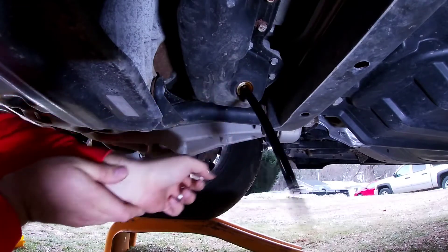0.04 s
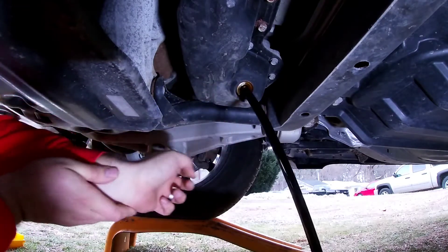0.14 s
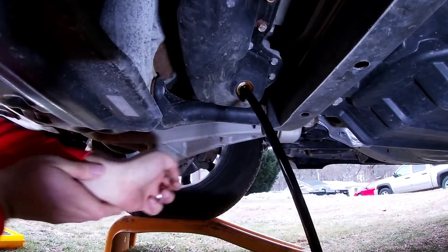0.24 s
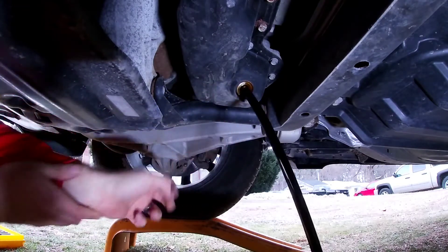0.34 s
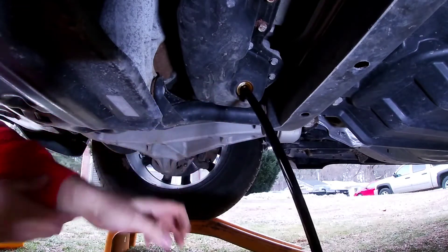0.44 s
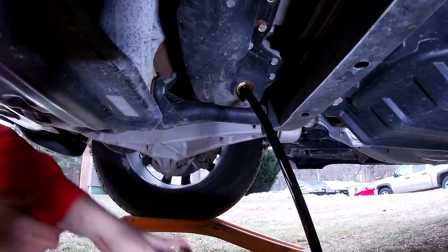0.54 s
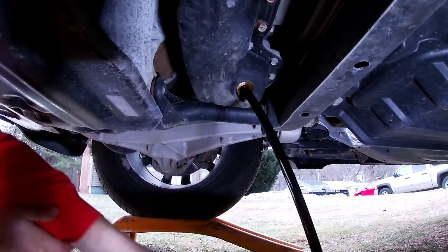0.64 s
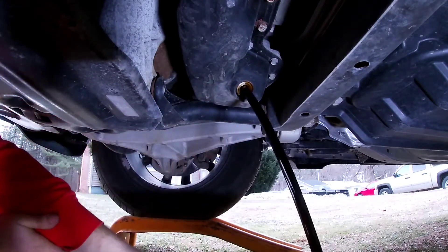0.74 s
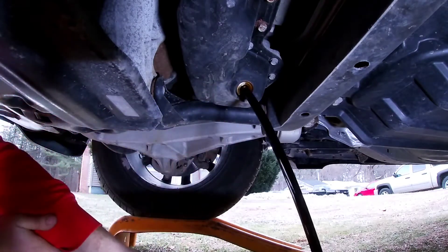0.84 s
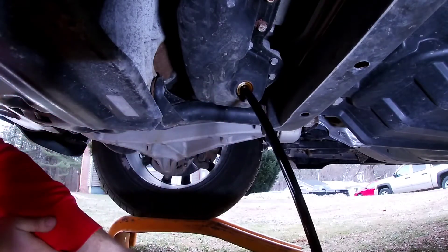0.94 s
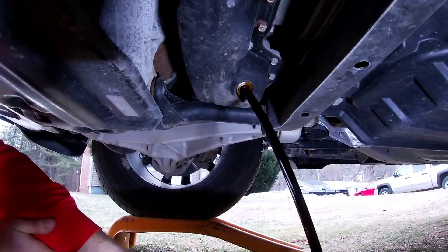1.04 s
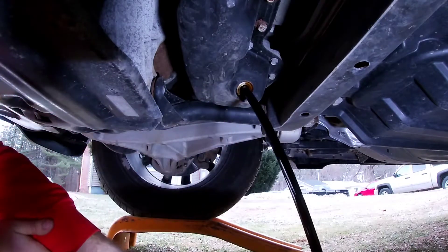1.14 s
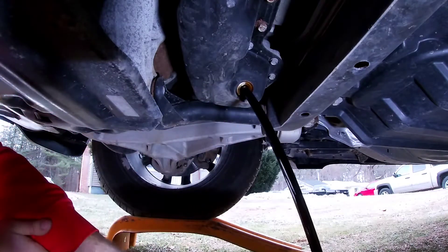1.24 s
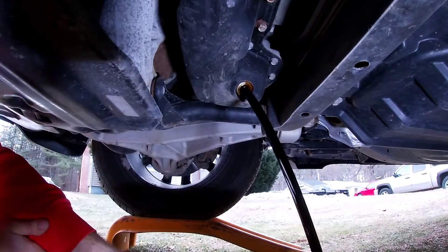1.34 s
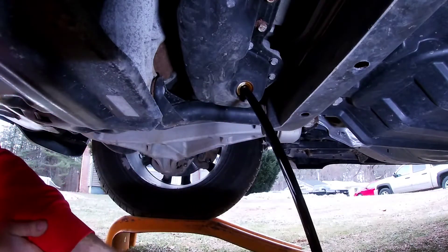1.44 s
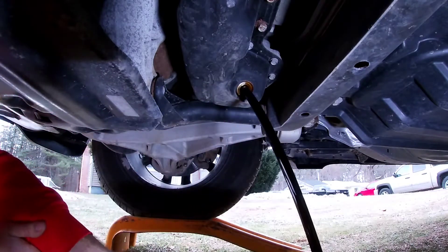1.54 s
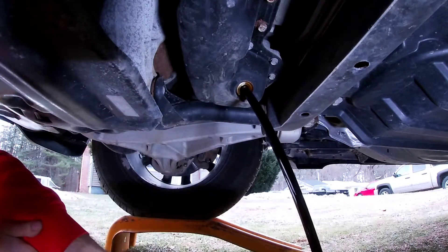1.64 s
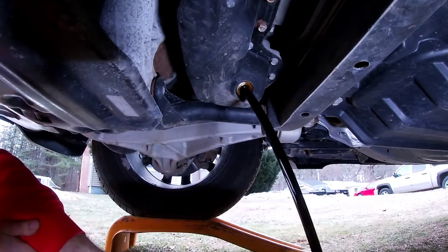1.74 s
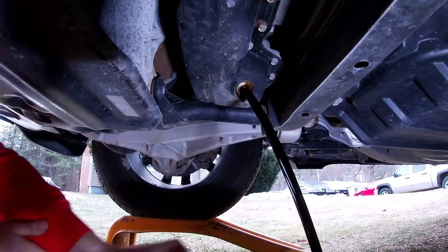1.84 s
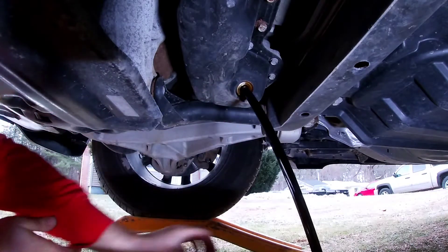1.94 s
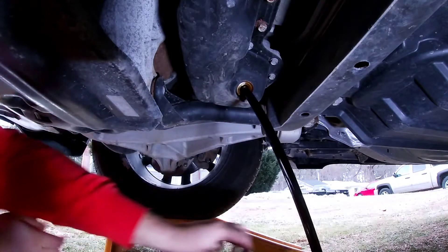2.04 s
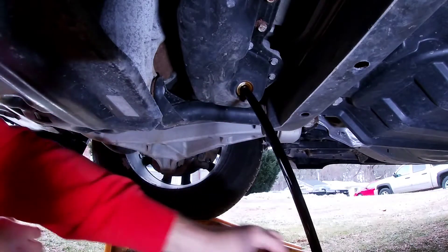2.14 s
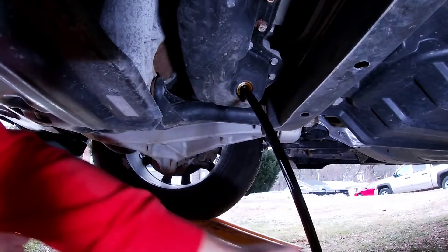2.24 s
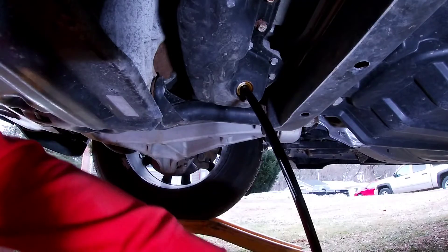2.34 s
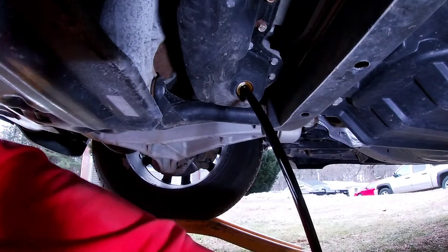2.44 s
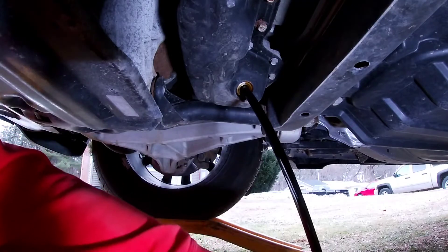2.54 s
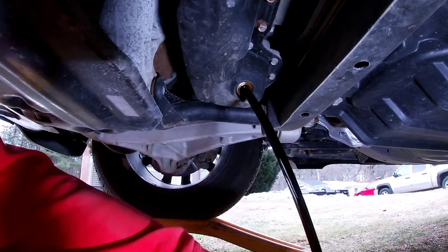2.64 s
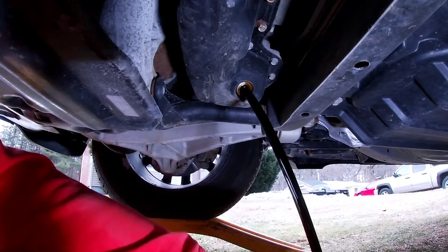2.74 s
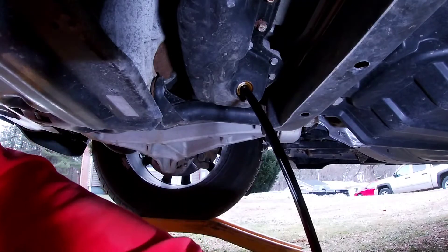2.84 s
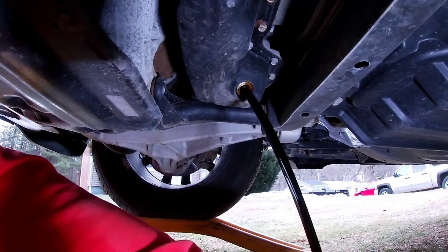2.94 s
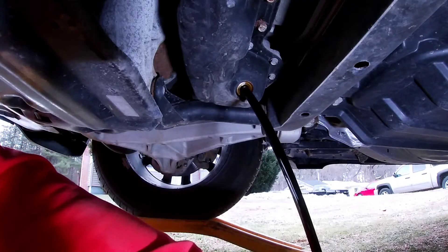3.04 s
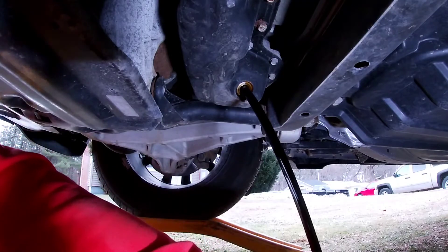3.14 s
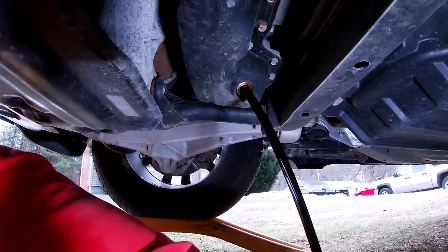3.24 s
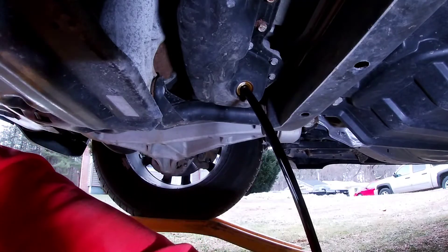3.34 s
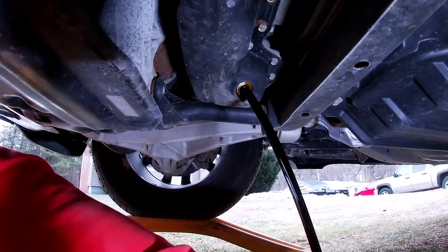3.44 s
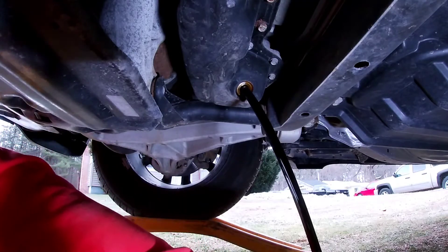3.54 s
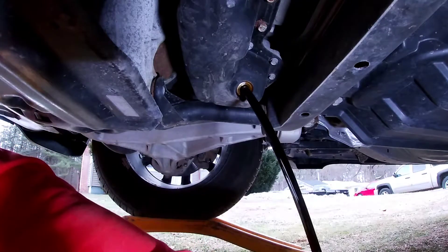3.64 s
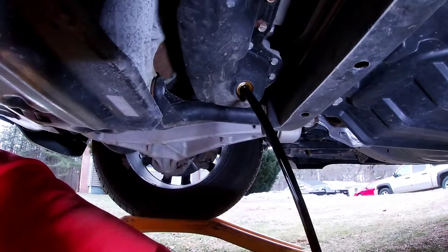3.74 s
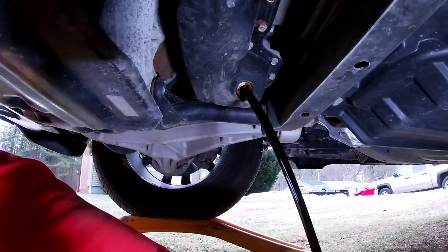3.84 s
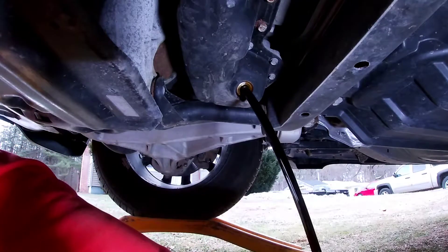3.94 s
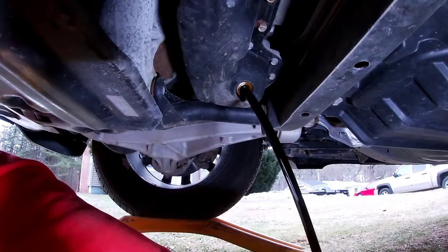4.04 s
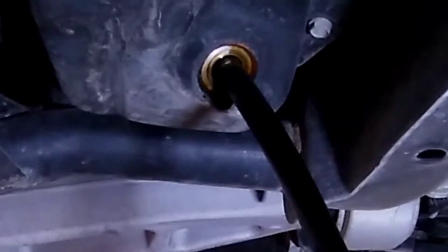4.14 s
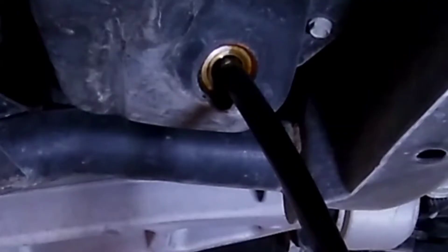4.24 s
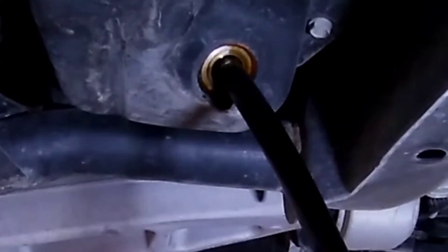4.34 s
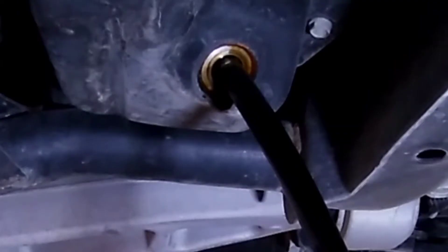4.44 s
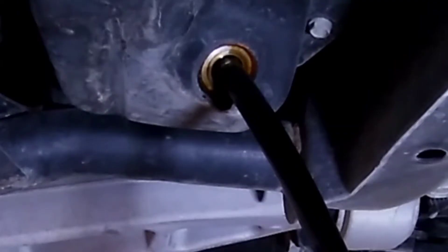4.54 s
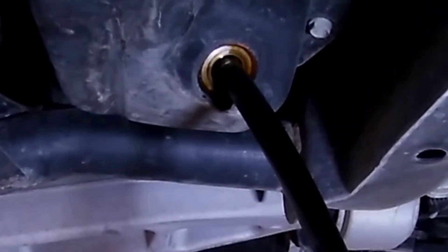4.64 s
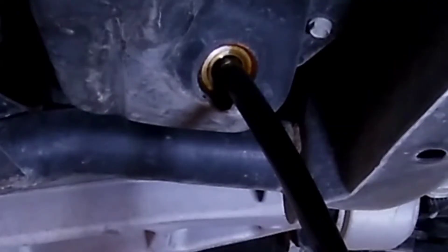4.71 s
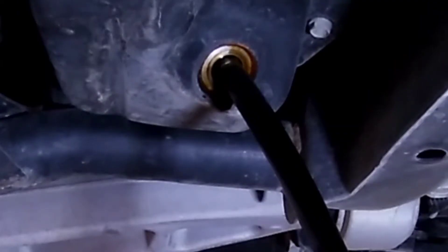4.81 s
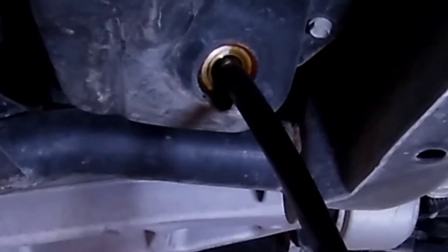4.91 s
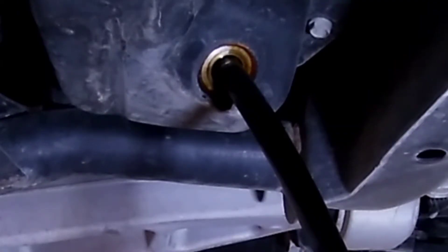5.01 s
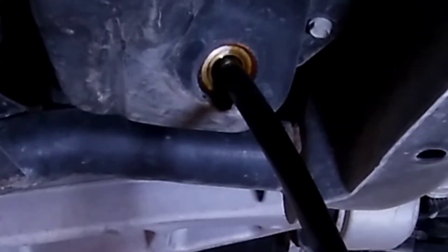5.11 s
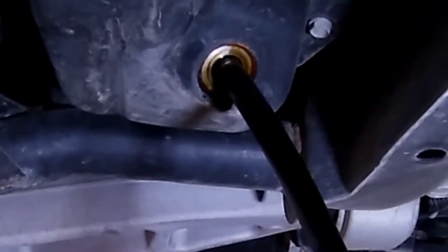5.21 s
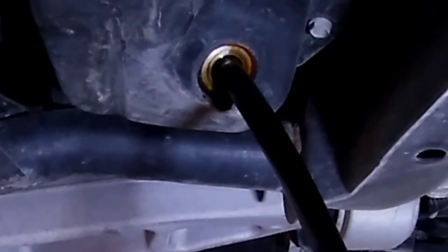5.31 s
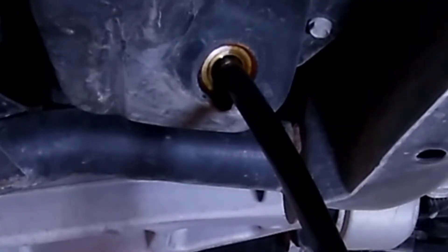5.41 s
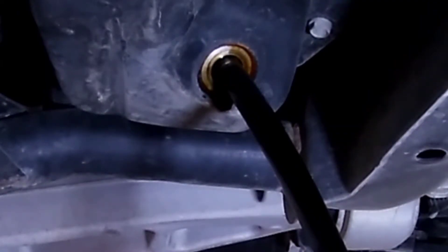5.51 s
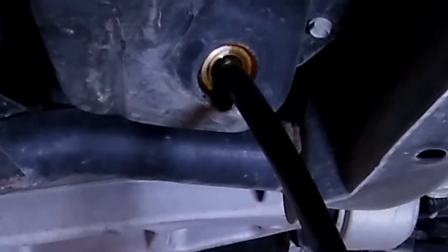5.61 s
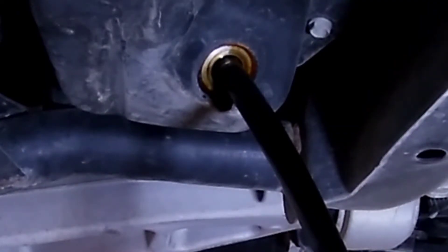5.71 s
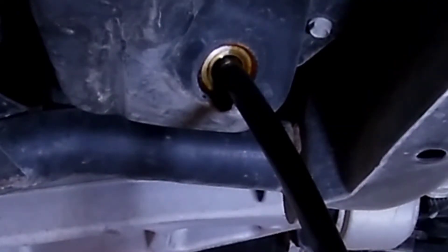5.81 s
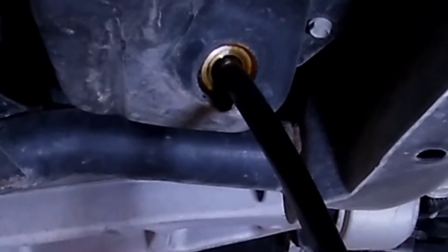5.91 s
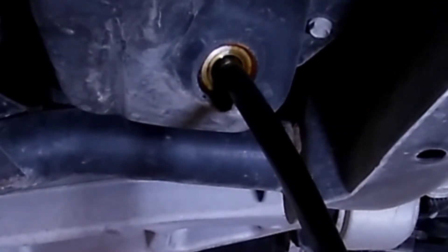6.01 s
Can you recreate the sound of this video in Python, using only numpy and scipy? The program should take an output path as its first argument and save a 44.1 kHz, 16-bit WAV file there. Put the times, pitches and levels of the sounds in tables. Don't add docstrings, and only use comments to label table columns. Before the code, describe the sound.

Hollow plastic knocks and sleeve rustle under a parked car, then from two seconds a bubbling, spitting stream of oil patters into the pan.

```python
import sys
import numpy as np
from scipy import signal
from scipy.fft import rfft, irfft, next_fast_len
from scipy.io import wavfile
from scipy.ndimage import uniform_filter1d

SR = 44100
rng = np.random.default_rng(int(sys.argv[2]) if len(sys.argv) > 2 else 0)


def natural_amplitude(level_db):
    exponent = np.asarray(level_db, float) / 20
    return 10 ** exponent


def store_pcm(level_fs):
    pcm = np.round(np.clip(level_fs, -1, 1) * 32767).astype(np.int16)
    wavfile.write(sys.argv[1], SR, np.atleast_2d(pcm).T)


N = 267687

# (frequency [Hz], level [dB per Hz])
BRIGHT_HISS = [(1500, -28.5), (3000, -5.5), (4500, 0.5), (6500, 1), (8000, 1), (11000, 4), (16000, -3)]


def unit(x):
    return x / np.sqrt(np.mean(x ** 2) + 1e-20)


def along(points, hz):
    f, v = np.transpose(points)
    return np.interp(np.log(hz + 1), np.log(f + 1), v)


def curves(rows):
    s, *cols = np.transpose(rows)
    return [np.interp(np.arange(N) / SR, s, c) for c in cols]


def filtered(x, response):
    m = next_fast_len(N + SR // 2)
    return irfft(rfft(x, m) * response(np.fft.rfftfreq(m, 1 / SR)), m)[..., :N]


def coloured(x, points):
    return unit(filtered(x, lambda hz: natural_amplitude(along(points, hz))))


def resonant(x, peaks):
    def response(f):
        total = 0
        for k, (centre, width, db) in enumerate(peaks):
            loss = 1j * f * width
            total = total + (-1) ** k * natural_amplitude(db) * loss / (centre * centre - f * f + loss)
        return total
    return filtered(x, response)


def rush(patchy_db):
    z = signal.stft(rng.standard_normal(N + 512), nperseg=256)[2]
    field = uniform_filter1d(rng.standard_normal(z.shape), 6, 0)
    field = uniform_filter1d(field, 6, 1)
    return signal.istft(z * natural_amplitude(patchy_db * unit(field)), nperseg=256)[1][:N]


def splutter(rate, spread_db, t60):
    slaps = (rng.random(N) < rate / SR) * natural_amplitude(spread_db * rng.exponential(size=N))
    slaps = signal.lfilter([1], [1, -natural_amplitude(-60 / (t60 * SR))], slaps)
    return 0.75 + slaps


def swell(start, length, db, rise, fall):
    t = np.arange(N) / SR
    return natural_amplitude(db - rise * np.maximum(start - t, 0) - fall * np.maximum(t - start - length, 0))


def bubbles(rows, rise, rough, size=2600, click=0.29):
    s, db, hz, t60 = np.transpose(rows)[:, :, None]
    t = np.arange(size) / SR
    draw = rng.standard_normal((len(rows), len(t)))
    wander = np.cumsum(draw, axis=1) * rough * np.sqrt(hz / SR)
    tone = np.sin(2 * np.pi * hz * t * (.97 + rise * t / t60) + wander)
    body = natural_amplitude(db - 60 * t / t60) * (1 - np.exp(-t * hz / 1.22)) * tone
    burst = click * natural_amplitude(db - 60 * t / 0.0036) * draw * np.minimum(1, hz / 3000)
    at = np.round(s * SR).astype(int) + np.arange(len(t))
    return np.bincount(at.ravel(), (body + burst).ravel(), N + SR)[:N]


def lived(rows):
    t60_s, knee_hz = 0.037, 5000
    return [(s, db, hz, t60_s / (1 + (hz / knee_hz) ** 2)) for s, db, hz in rows]


def ring(modes, t, t60, rough):
    x = 0
    for hz, db, life in modes:
        wander = rough * np.sqrt(hz / SR) * np.cumsum(rng.standard_normal(len(t)))
        fade = natural_amplitude(-60 * t / (life * t60)) + 0.081 * natural_amplitude(-60 * t / (3 * life * t60))
        tone = np.sin(2 * np.pi * hz * t + wander + rng.uniform(0, 2 * np.pi))
        x = x + natural_amplitude(db + rng.normal(0, 1.53)) * fade * tone
    x = x * (1 - np.exp(-t / 0.00084))
    return x / np.abs(x).max()


def outdoors():
    # (time [s], level [dB])
    ground = [(0.0, -62), (0.2, -59), (0.46, -56), (0.61, -62.5), (1.1, -61), (2.4, -60.5), (2.8, -61.5),
              (3.16, -60.5), (3.31, -60.5), (4.38, -62), (4.73, -58.5), (5.07, -62), (5.48, -62.5),
              (5.66, -64.5), (6.07, -60)]
    # (frequency [Hz], level [dB per Hz])
    traffic = [(15, -39), (25, 2.5), (54, -3.5), (160, -7), (448, -22.5), (700, -22.5), (910, -37.5),
               (1540, -120)]
    # (frequency [Hz], width [Hz], level [dB])
    engine = [(54.6, 9, 1), (114, 11, -2), (155.3, 26, -6.5)]
    # (frequency [Hz], level [dB per Hz])
    air = [(300, -36.5), (600, -8), (900, 3), (1600, 0), (2500, -14.5), (5000, -10), (8000, -16.5),
           (16000, -17.5)]
    ground_db, = curves(ground)
    rumble = coloured(rush(patchy_db=3.0), traffic)
    drone = unit(resonant(resonant(rush(patchy_db=0.5), engine), engine))
    hiss = coloured(rush(patchy_db=3.5), air)
    return natural_amplitude(ground_db) * (1.45 * rumble + 0.8 * drone) + natural_amplitude(-64.5) * hiss


def underside(x):
    # (frequency [Hz], t60 [s])
    decay = [(200, 0.2), (1500, 0.063), (8000, 0.064)]
    hz, t, z = signal.stft(rng.standard_normal(SR // 3), SR, nperseg=256)
    tail = signal.istft(z * natural_amplitude(-60 * t / along(decay, hz)[:, None]), SR, nperseg=256)[1]
    return signal.fftconvolve(np.pad(x, (150, 0)), tail / np.linalg.norm(tail))[:N]


def rustle():
    # (start [s], length [s], level [dB], brightness [dB])
    rubs = [
        (0, 0.056, -54, -6),
        (0.104, 0.28, -66, -11),
        (0.435, 0.22, -56, -1),
        (0.856, 0.21, -62.5, -3.5),
        (1.155, 0.13, -58.5, 2.5),
        (1.353, 0.18, -64.5, -1.5),
        (1.634, 0.2, -60.5, -0.5),
    ]
    # (frequency [Hz], level [dB per Hz])
    cloth = [(400, -22), (800, -2), (1500, 1), (2500, -5), (3500, -7), (5000, -39)]
    t = np.arange(N) / SR
    dull, hiss = 0, 0
    for s, length, db, bright_db in rubs:
        stroke = swell(s, length, db, rise=300, fall=360)
        brighter_db = 38 * (t - s - length / 2).clip(-1, 1)
        dull = dull + stroke
        hiss = hiss + stroke * natural_amplitude(bright_db + brighter_db)
    grain = splutter(rate=110, spread_db=-2.5, t60=0.02)
    low = coloured(grain * rush(patchy_db=-1.3), cloth)
    high = coloured(grain * rush(patchy_db=.8), BRIGHT_HISS)
    return dull * low + hiss * high


def drag():
    # (start [s], length [s], level [dB])
    moves = [
        (2.197, 0.45, -66.5),
        (5.553, 0.46, -65),
    ]
    gain = sum(swell(s, length, db, 60, 40) for s, length, db in moves)
    return gain * unit(resonant(rng.standard_normal(N), [(290, 189, 0)]))


def shove():
    # (frequency [Hz], width [Hz], level [dB])
    hollow = [(161, 80, -6), (265, 58, 0), (460, 43, -1.5), (610, 150, -1.5), (950, 110, -22),
              (1190, 74, -4), (1450, 77, -28)]
    return swell(5.42, 0, -42, rise=1000, fall=300) * unit(resonant(rush(patchy_db=-2.0), hollow))


def chink():
    # (frequency [Hz], width [Hz], level [dB])
    steel = [(637, 17, 0.5), (920, 32, -14), (1095, 18, -6), (1484, 56, -10), (1830, 110, -8),
             (2030, 79, -5), (2350, 260, -7), (2570, 99, -2.5), (2760, 130, -1.5), (6360, 16000, -34.5)]
    # (time [s], peak [dB], pitch [Hz], t60 [s])
    rings = [
        (.057, -24, 2735, .09),
        (.04, -37, 635, .15),
        (.066, -32, 635, .12),
        (.05, -33, 926, .14),
        (0.056, -36, 1088, .1),
        (5.408, -40, 1180, .35),
    ]
    out = swell(0.051, 0.021, -29, rise=1100, fall=770) * unit(resonant(rush(patchy_db=-3.5), steel))
    t = np.arange(N) / SR
    for s, db, hz, t60 in rings:
        since = np.maximum(t - s, 0)
        tone = np.sin(2 * np.pi * hz * since + 0.01 * np.cumsum(rng.standard_normal(N)))
        out = out + natural_amplitude(db - 60 * since / t60) * tone * (1 - np.exp(-since * hz / 8))
    squeal = unit(resonant(rush(patchy_db=1), [(3510, 60, 0)]))
    return out + swell(.13, .14, -69, rise=350, fall=700) * squeal


def knocks():
    # (time [s], peak [dB], thud [dB], hardness [dB], t60 [s])
    blows = [(0.281, -39, -26, -6, 0.047), (0.288, -39.5, -7, -3, 0.14), (0.31, -22.5, -4.5, -2.5, 0.05),
             (0.3187, -7, -10, -3.5, 0.02), (0.443, -36.5, -15.5, -6.5, 0.073),
             (0.467, -39, -21.5, -1, 0.021), (0.521, -14, -7, -13, 0.056),
             (0.5359, -12.5, -12.5, -2, 0.033), (0.581, -21, -10, -7, 0.059),
             (0.609, -30, -7.5, -17, 0.045), (0.809, -22.5, -5.5, -13, 0.039), (0.818, -24, -7, -20, 0.051),
             (0.856, -32.5, -8, -18, 0.039), (0.84, -29, -18, -16, 0.06), (0.871, -39, -16, -5, 0.031),
             (0.986, -44.5, -26, -7.5, 0.12), (1.042, -47.5, -8, -14, 0.033),
             (1.36, -34.5, -14.5, -1, 0.027), (1.381, -47, 0, 5, 0.058), (1.405, -44, -10.5, -9, 0.08),
             (3.255, -27.5, -12.5, -7.5, 0.065), (4.582, -32.5, -17, -22, 0.071),
             (4.629, -35, -15.5, -12, 0.042), (5.066, -38.5, -22, -3, 0.021)]
    # (frequency [Hz], level [dB], relative life [1])
    bottom = [(59, -11.5, 5.8), (80, -7.5, 2.8), (132, -8, 2.1), (163.2, 1.5, 2.13), (196.4, -5.5, 2.1),
              (231.2, -4, 2.17), (322.2, 2, 1.2), (420.3, 3.5, 0.71), (509, -1.5, 0.75), (616, -4.5, 0.9)]
    # (frequency [Hz], level [dB], relative life [1])
    walls = [(738, -5.5, 0.81), (859, -4.5, 1.3), (1030, -5.5, 1.2), (1190, 2, 0.63), (1345, -4.5, 0.92),
             (1486, 2, 0.5), (1590, -7, 0.51), (1760, -7, 0.7)]
    # (frequency [Hz], level [dB], relative life [1])
    rim = [(1937, -2.5, 0.9), (2250, -5.5, 1), (2432, -6, 0.92), (2773, -4, 0.93), (2930, -4, 0.76),
           (3043, -4.5, 0.41), (3520, -8, 0.88), (4046, -3, 0.42)]
    out, t = np.zeros(N + SR), np.arange(SR // 3) / SR
    for s, db, thud_db, hard_db, t60 in blows:
        thud = np.roll(ring(bottom, t, t60 * 1.6, rough=.2), 110)
        crack = np.convolve(rng.standard_normal(len(t)), [1, 1, -1, -1], "same") / 2
        crack = crack * natural_amplitude(-60 * t / (.5 * t60))
        crack_db = -1.5 + 2.27 * hard_db
        blow = ring(walls, t, t60, rough=.22) + natural_amplitude(hard_db) * ring(rim, t, t60, rough=.35)
        blow = blow + natural_amplitude(thud_db + 3.5) * thud + natural_amplitude(crack_db) * crack
        out[round(s * SR):][:len(t)] += natural_amplitude(db) * blow
    return out[:N]


def clacks():
    # (time [s], peak [dB], pitch [Hz], t60 [s])
    clicks = [(.061, -28, 6730, 0.0086), (.872, -39, 4000, 0.0085), (5.003, -34, 5000, 0.018),
              (0.2882, -28, 1670, 0.02), (0.3187, -2, 1497, 0.022), (3.2548, -32, 3130, 0.014),
              (0.9871, -35, 1576, 0.027), (1.042, -37, 1486, 0.016), (1.3594, -22, 1353, 0.019),
              (1.4026, -42, 1040, 0.048), (3.2578, -15, 1450, 0.023), (3.2566, -23, 2030, 0.0075)]
    return bubbles(clicks, rise=0.011, rough=0.3, click=.12)


def thumps():
    # (time [s], peak [dB], pitch [Hz], t60 [s])
    booms = [(5.408, -24, 300, .025), (5.421, -10, 205, .027), (5.4345, -15, 200, .025),
             (5.446, -21, 220, .03), (2.128, -42, 260, .04), (.547, -25, 165, .17), (.522, -14, 520, .06),
             (.333, -19, 220, .12), (.3225, -9, 322, .055), (.325, -29, 70, .12), (.3215, -9, 425, .05),
             (.3215, 0, 160, .04)]
    return bubbles(booms, rise=.01, rough=.08, size=9000)


def more_clacks():
    # (time [s], peak [dB], pitch [Hz], t60 [s])
    more_clicks = [(.283, -28, 1620, .012), (.331, -25, 1410, 0.014), (.346, -31, 1300, 0.017),
                   (.522, -22, 2800, 0.016), (.537, -21, 1120, 0.034), (.545, -20, 1470, 0.03),
                   (.582, -26, 2710, 0.014), (.608, -32, 2740, 0.01), (.8105, -17.5, 1604, 0.015),
                   (.817, -31, 2800, 0.016), (.818, -20, 740, 0.031), (.84, -34, 2740, 0.014),
                   (.855, -36, 2820, .012), (1.36, -35.5, 1030, 0.05), (3.2562, -15, 1060, 0.035),
                   (3.262, -33, 694, 0.05), (3.257, -24, 1153, .025), (3.0905, -39, 1500, 0.014),
                   (3.091, -37, 2500, .015), (3.091, -45, 4600, 0.01), (2.243, -41, 1640, 0.027),
                   (2.3, -45, 1220, 0.047), (5.445, -37.5, 1193, 0.054), (2.516, -40, 1890, 0.027),
                   (.3195, -9, 1700, .015), (.3205, -9.5, 1200, 0.027)]
    return bubbles(more_clicks, rise=.01, rough=0.29, click=.1)


def sheets():
    # (start [s], length [s], level [dB])
    throws = [
        (2.07, .11, -52),
        (3.029, .008, -50),
        (3.487, .015, -58),
        (4.47, .08, -55),
        (4.82, .01, -57),
        (5.39, .05, -60),
        (5.8, .04, -62),
    ]
    # (frequency [Hz], level [dB per Hz])
    fine = [(2000, -40), (3000, -4), (7000, 0), (10000, 6), (15000, 2)]
    gain = sum(swell(s, length, db, 1500, 500) for s, length, db in throws)
    return gain * coloured(rng.standard_normal(N), fine)


def splashes():
    # (time [s], peak [dB], centre [Hz])
    flecks = [(1.9909, -47, 7700), (2.1051, -40, 4280), (2.164, -34, 7080), (2.1974, -46, 7640),
              (2.2902, -52, 5400), (2.3411, -45, 5940), (2.4317, -42, 6900), (2.4484, -54, 5790),
              (2.4927, -44, 7700), (2.5122, -50, 4320), (2.6594, -53, 5470), (2.7685, -40.5, 5830),
              (2.8235, -50, 6750), (2.8539, -51, 6060), (2.9163, -43, 6950), (3.0624, -39.5, 6900),
              (3.1044, -47, 4830), (3.1832, -43, 6000), (3.2141, -49, 4810), (3.2817, -33, 7280),
              (3.354, -41, 4370), (3.4153, -35.5, 4310), (3.4296, -40.5, 6000), (3.4983, -41.5, 5800),
              (3.5339, -49, 5000), (3.621, -38, 7230), (3.6416, -45.5, 6050), (3.784, -47, 5500),
              (3.8914, -44, 6850), (3.934, -43, 5850), (3.9858, -44, 4800), (4.006, -40, 7280),
              (4.042, -32, 8530), (4.1041, -43, 7150), (4.1814, -52, 7450), (4.2914, -41, 5000),
              (4.3114, -42, 6030), (4.3803, -43, 6900), (4.455, -38, 7560), (4.4962, -43, 7000),
              (4.506, -36.5, 6600), (4.5244, -42, 6240), (4.6094, -44, 4810), (4.6314, -38.5, 7420),
              (4.6534, -54, 5700), (4.6723, -36, 4510), (4.7237, -42, 4770), (4.795, -51, 4930),
              (4.89, -39, 5890), (4.9367, -37.5, 4800), (5.02, -38, 4850), (5.0692, -39, 5560),
              (5.125, -41, 5740), (5.137, -40.5, 4600), (5.2254, -33, 6500), (5.3298, -41, 4670),
              (5.39, -36, 6970), (5.6067, -43, 6450), (5.7364, -42, 5400), (5.9584, -37, 5140)]
    # (time [s], peak [dB], pitch [Hz])
    drops = [(2.011, -42, 1400), (2.048, -47, 1370), (2.071, -42, 1780), (2.087, -46, 1800),
             (2.13, -35, 1640), (2.179, -37.5, 3470), (2.257, -42, 880), (2.308, -43, 1670),
             (2.393, -35.5, 1620), (2.467, -38, 3220), (2.566, -38, 1590), (2.628, -40, 1350),
             (2.664, -44, 1590), (2.765, -41.5, 1316), (2.825, -43, 1640), (2.859, -40, 1390),
             (2.929, -39, 1600), (2.956, -39.5, 1565), (3.032, -41, 1640), (3.061, -40, 1500),
             (3.193, -40, 1440), (3.353, -46, 2760), (3.452, -52, 1590), (3.487, -32.5, 1645),
             (3.5, -39, 1660), (3.609, -46, 2650), (3.784, -35.5, 2930), (3.799, -38.5, 1350),
             (3.868, -40.5, 2610), (3.958, -40, 2600), (4.005, -39.5, 1670), (4.037, -43, 1590),
             (4.104, -43, 1630), (4.167, -39, 1010), (4.199, -41, 930), (4.277, -38.5, 2650),
             (4.379, -42, 2680), (4.507, -46, 1630), (4.558, -36, 1520), (4.738, -38, 996),
             (4.869, -32, 2610), (4.917, -42, 3100), (5.356, -35.5, 2610), (5.389, -41, 950),
             (5.539, -43, 850), (5.8, -28.5, 3400), (5.891, -39, 1290), (5.934, -34, 4100),
             (5.994, -34, 935), (6.054, -45, 3030)]
    longer = np.multiply(lived(flecks), [1, 1, 1, 1.48])
    bursts = bubbles(longer, rise=0.074, rough=1.48, size=1200)
    slaps = bubbles(lived(drops), rise=0.086, rough=0.61)
    return natural_amplitude(-2.5) * bursts + natural_amplitude(-5) * slaps


def popping():
    # (time [s], peak [dB], pitch [Hz])
    plops = [(2.033, -34, 1706), (2.108, -37.5, 1830), (2.241, -34, 1065), (2.345, -38.5, 1580),
             (2.367, -36, 1670), (2.514, -38, 995), (2.916, -39, 1690), (3.09, -41.5, 1035),
             (3.128, -38, 1690), (4.156, -41, 977), (4.42, -40.5, 1030), (4.475, -45.5, 895),
             (4.629, -37, 1180), (5.067, -42, 1610), (5.137, -41, 1650), (5.42, -36, 1190),
             (5.505, -42, 950), (5.568, -41.5, 1010), (5.781, -36.5, 950), (6.0204, -36, 6260)]
    # (time [s], peak [dB], pitch [Hz])
    pops = [(1.9295, -39, 3820), (1.949, -35, 2190), (2.0358, -32.5, 2930), (2.2408, -36.5, 2110),
            (2.3671, -42, 2720), (2.519, -33, 2990), (3.0898, -33, 3520), (3.1435, -39, 3740),
            (3.3312, -36.5, 4170), (3.4162, -45, 2720), (3.7574, -39.5, 3740), (3.8437, -39.5, 3330),
            (4.006, -43, 2670), (4.156, -35.5, 2250), (4.2493, -46, 2650), (4.4717, -43, 2650),
            (4.8031, -39.5, 3870), (4.815, -31, 2720), (4.8483, -25.5, 2865), (4.9574, -31, 2594),
            (4.9917, -45, 2620), (5.003, -36.5, 2990), (5.1771, -38, 2650), (5.3316, -43, 2650),
            (5.3712, -34.5, 4290), (5.6743, -30.5, 4830), (5.7801, -33.5, 3630), (5.8366, -35.5, 3500),
            (5.8621, -41, 3970), (5.9603, -38, 3730)]
    # (time [s], peak [dB], pitch [Hz])
    ticks = [(1.878, -43.5, 8050), (2.2337, -33.5, 5530), (2.3661, -33.5, 8200), (2.4207, -36.5, 6360),
             (2.6278, -36, 6300), (2.7882, -41.5, 5680), (3.0281, -36, 7220), (3.27, -33.5, 6950),
             (3.406, -37, 4810), (3.4484, -35, 7950), (3.4798, -33.5, 7970), (3.5961, -38.5, 6900),
             (3.6709, -38.5, 5850), (3.839, -38.5, 5520), (4.0725, -29, 6800), (4.1206, -29.5, 8150),
             (4.4292, -34.5, 7470), (4.4726, -38.5, 6700), (4.7415, -35.5, 4900), (4.8662, -35.5, 5500),
             (4.9903, -32, 6080), (5.176, -32.5, 6250), (5.2892, -34, 7300), (5.3715, -32, 4800),
             (5.4249, -31, 6260), (5.5063, -25.5, 5750), (5.797, -34, 7400), (5.8351, -30, 6120),
             (5.8928, -38, 6150), (6.033, -29.5, 6080)]
    # (time [s], peak [dB], pitch [Hz], t60 [s])
    squeak = [
        (5.196, -45.5, 6230, 0.22),
    ]
    out = bubbles(lived(plops), rise=0.069, rough=0.41)
    out = out + bubbles(lived(pops), rise=0.13, rough=0.45)
    out = out + bubbles(lived(ticks), rise=0.173, rough=0.77)
    return out + bubbles(squeak, rise=0.18, rough=.05, size=1150)


def stream():
    # (time [s], flow [dB])
    flow = [(1.83, -94), (1.87, -69.5), (2.01, -60.5), (2.05, -52.5), (2.14, -52), (2.68, -55.5),
            (3.0, -57), (3.3, -56.5), (3.49, -52), (3.64, -56), (4.05, -53), (4.38, -56), (4.64, -50),
            (4.86, -51), (5.42, -46.5), (5.6, -51.5), (5.8, -47.5), (6.07, -54.5)]
    # (time [s], change [dB], length [s])
    wavers = [(2.736, -5, 0.052), (2.767, 3, 0.017), (2.887, -1.5, 0.051), (2.916, 4, 0.046),
              (3.287, -5, 0.022), (3.584, -5, 0.079), (3.607, 5, 0.04), (4.072, 7.5, 0.0074),
              (4.427, 6.5, 0.02), (4.456, -5, 0.015), (4.476, 12, 0.02), (4.69, -2, 0.1), (4.94, -3, 0.13),
              (5.075, -5.5, 0.14), (5.298, -9.5, 0.11), (5.588, 4.5, 0.095), (5.669, -6, 0.16),
              (6.012, -2, 0.018), (6.029, 5, 0.025), (2.008, 7, 0.022), (2.162, 2.5, 0.043)]
    # (frequency [Hz], width [Hz], level [dB])
    pan = [(779, 85, 0.5), (1023, 68, 1), (1190, 36, -1), (1350, 81, 2), (1650, 91, 3.5), (2110, 69, -3),
           (2282, 74, -3.5), (2650, 96, 1.5), (3190, 150, -5), (3520, 140, -8.5), (3910, 150, -10),
           (4810, 67, -14.5)]
    t, (flow_db,) = np.arange(N) / SR, curves(flow)
    waver_db = sum(db * np.exp(-(2 * (t - s) / length) ** 2) for s, db, length in wavers)
    drum_db = flow_db + waver_db
    usual_db = -54
    spray_db = usual_db + 1.28 * (flow_db - usual_db) + 1.42 * waver_db
    spray_db = spray_db - 4.5 + 0.74 * (t - 2)
    shared = splutter(rate=65, spread_db=1.2, t60=0.03)
    drum = unit(resonant(shared * rush(patchy_db=1.16), pan))
    mist = shared * splutter(rate=120, spread_db=1.2, t60=0.012) * rush(patchy_db=-2.5)
    spray = coloured(mist, BRIGHT_HISS)
    when, pitch, size = rng.random((1500, 3)).T
    small = np.c_[when * (N / SR), 8 * size ** 3, 2500 * 3.6 ** pitch, .008 + .012 * size]
    fizz = unit(bubbles(small, rise=0.081, rough=0.38, size=900))
    return natural_amplitude(drum_db - 1.5) * drum + natural_amplitude(spray_db - 1.5) * (1.315 * spray + 0.42 * fizz)


def scene():
    hits = knocks() + clacks() + thumps()
    pops = popping()
    near = splashes() + more_clacks()
    echoes = natural_amplitude(-11.0) * underside(hits) + natural_amplitude(-7) * underside(pops) + natural_amplitude(-6.5) * underside(near)
    background = outdoors() + rustle() + drag() + shove()
    return (background + chink() + hits + near + sheets() + pops + echoes + stream())[None]


def roll_off(x):
    return signal.sosfilt(signal.butter(12, 15500, fs=SR, output="sos"), x)


def record(dry):
    # (frequency [Hz], level [dB])
    mic = [(20, -18.5), (45, 0), (7500, 1), (8500, -6.5), (10000, -19.5), (11500, -28), (13000, -31),
           (15500, -39)]
    x = dry / (1 + np.abs(dry / .9) ** 8) ** (1 / 8)
    x = filtered(x, lambda hz: natural_amplitude(along(mic, hz)))
    x = x + natural_amplitude(-98) * rng.standard_normal(N)
    return roll_off(x)


dry = scene()
out = record(dry)
store_pcm(out)
```